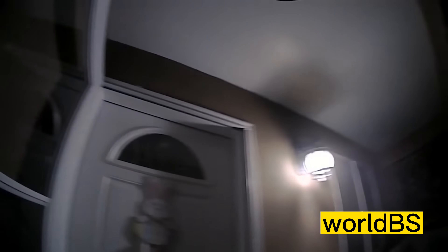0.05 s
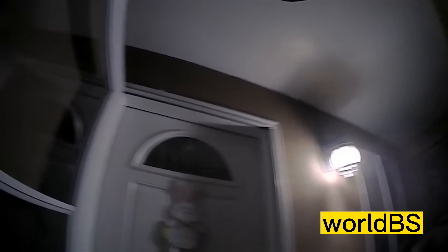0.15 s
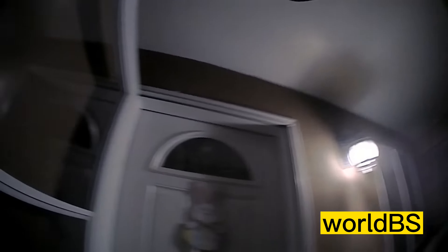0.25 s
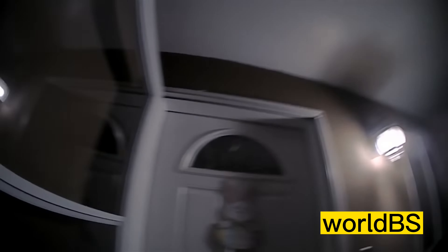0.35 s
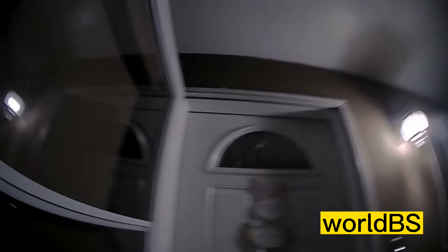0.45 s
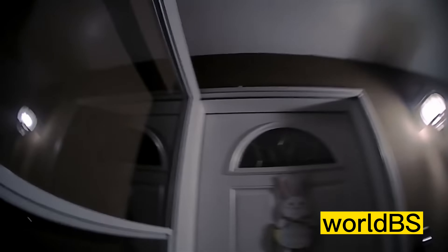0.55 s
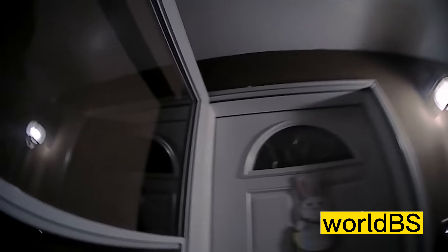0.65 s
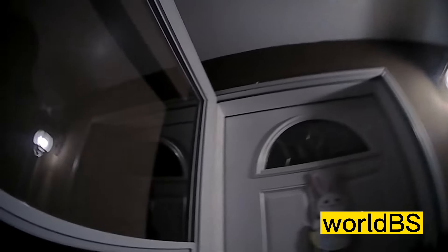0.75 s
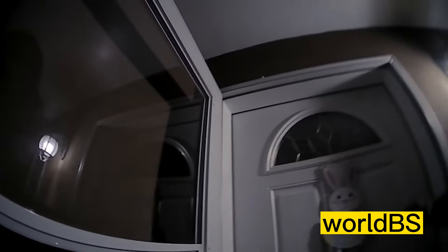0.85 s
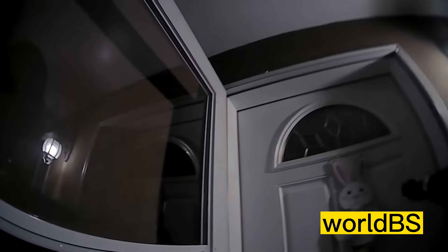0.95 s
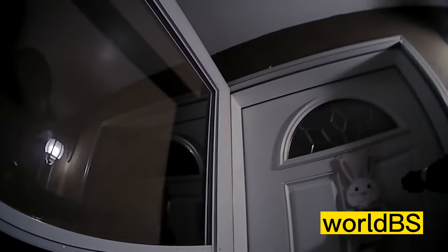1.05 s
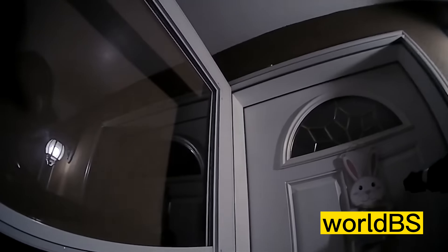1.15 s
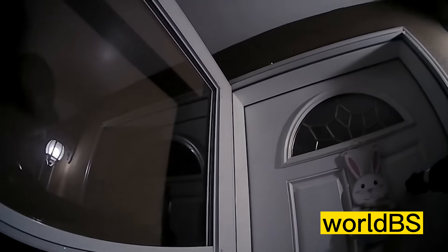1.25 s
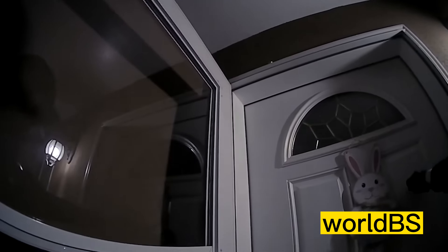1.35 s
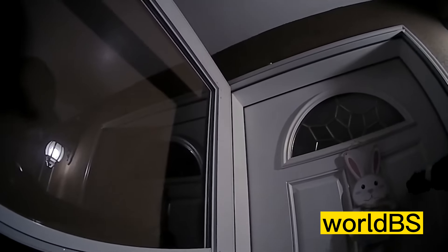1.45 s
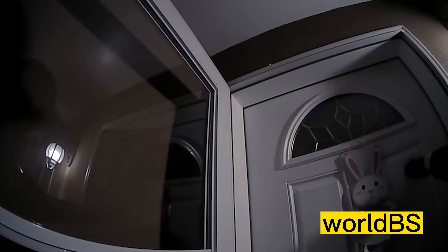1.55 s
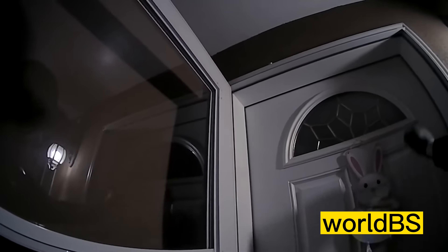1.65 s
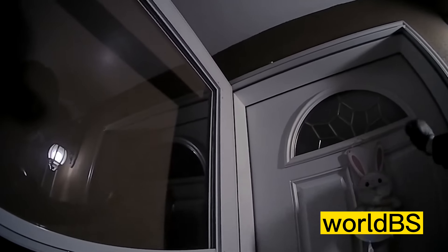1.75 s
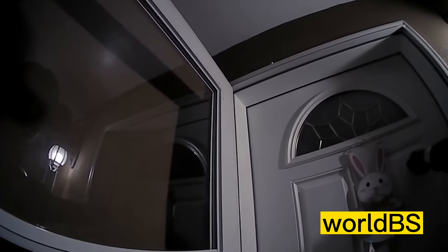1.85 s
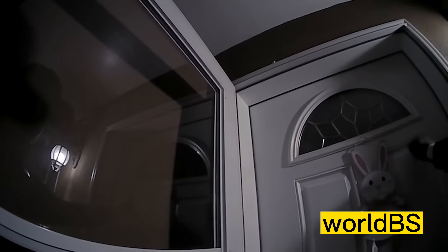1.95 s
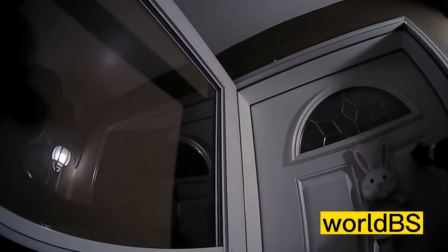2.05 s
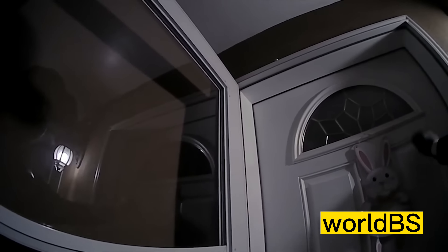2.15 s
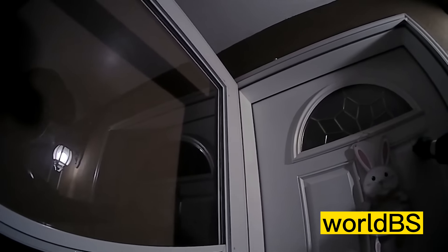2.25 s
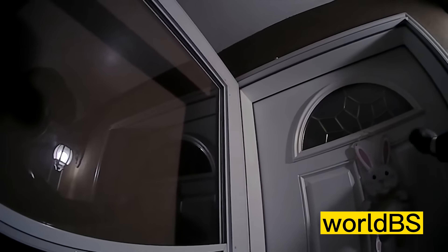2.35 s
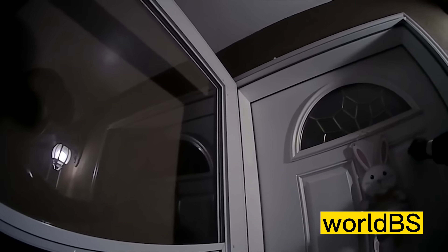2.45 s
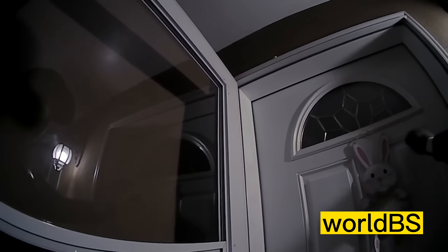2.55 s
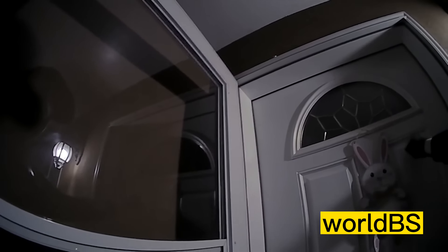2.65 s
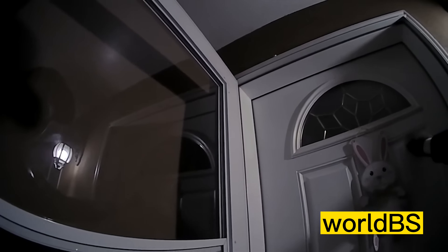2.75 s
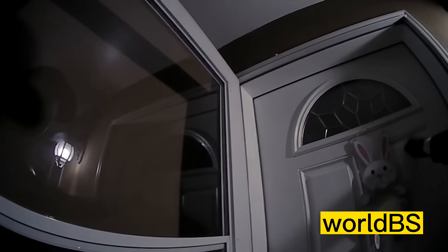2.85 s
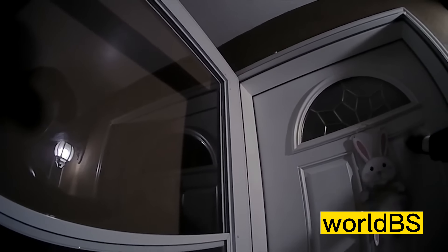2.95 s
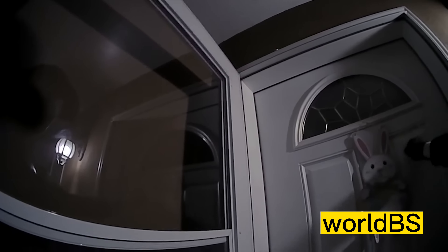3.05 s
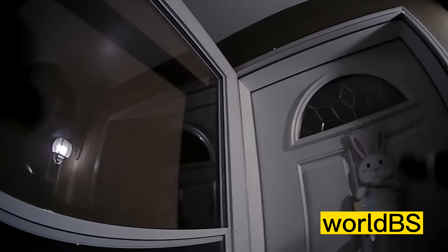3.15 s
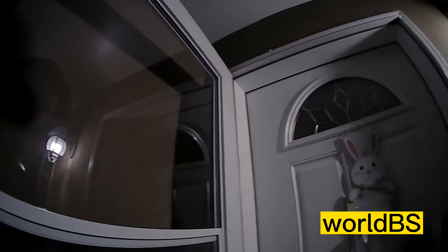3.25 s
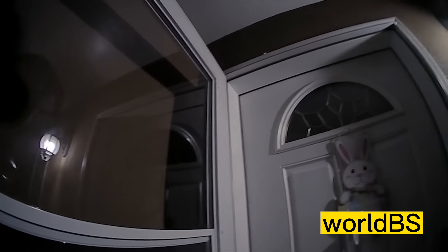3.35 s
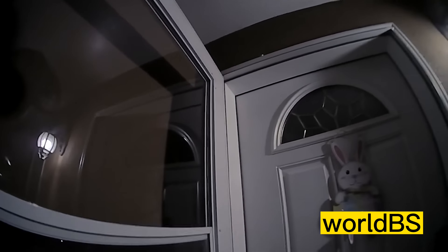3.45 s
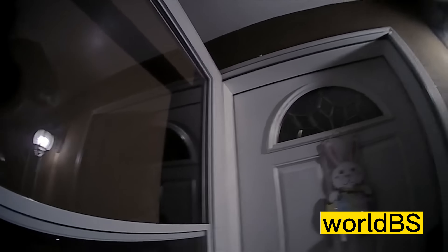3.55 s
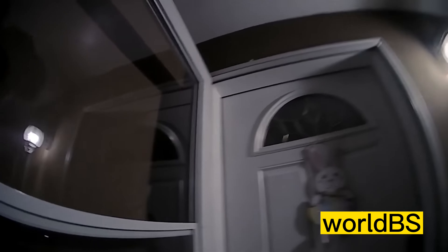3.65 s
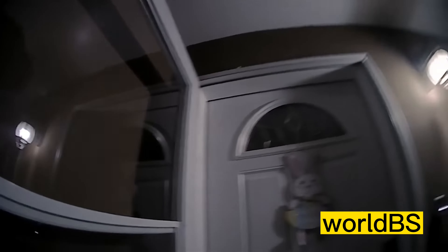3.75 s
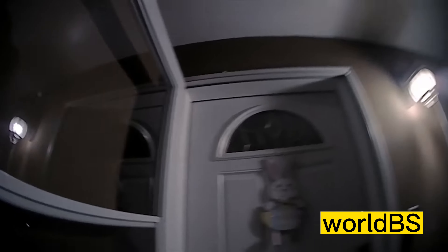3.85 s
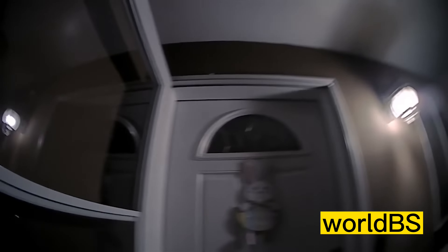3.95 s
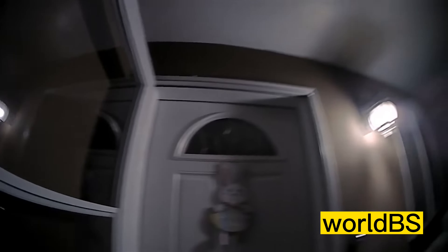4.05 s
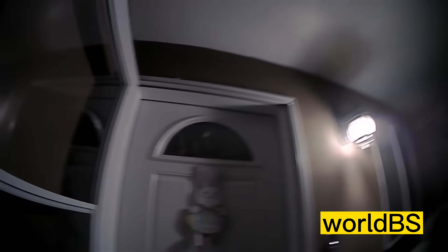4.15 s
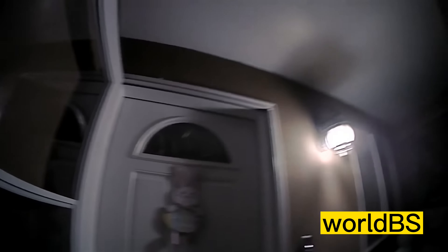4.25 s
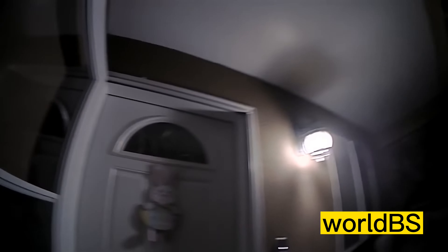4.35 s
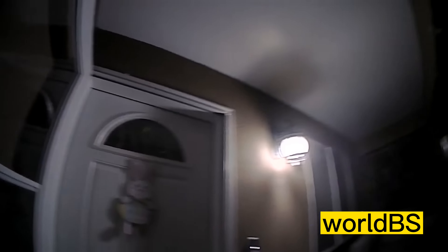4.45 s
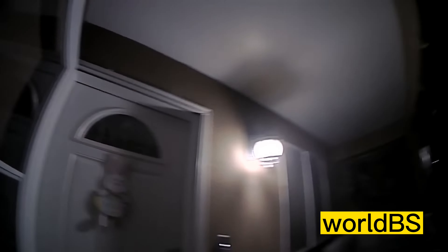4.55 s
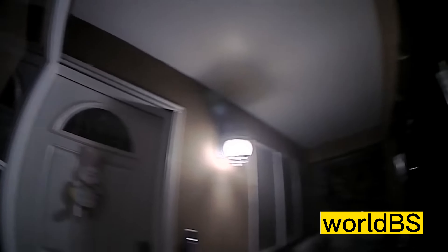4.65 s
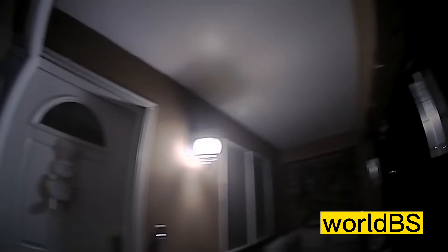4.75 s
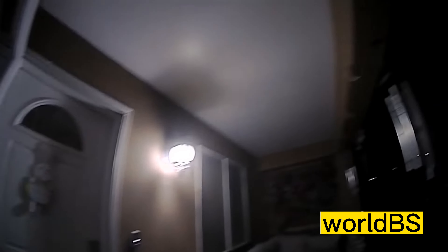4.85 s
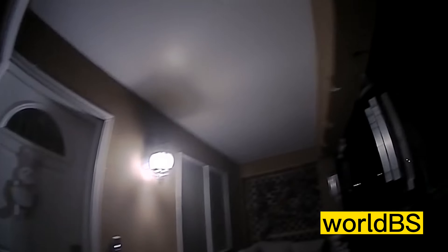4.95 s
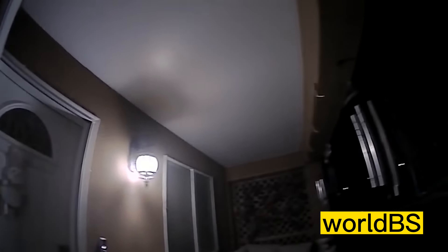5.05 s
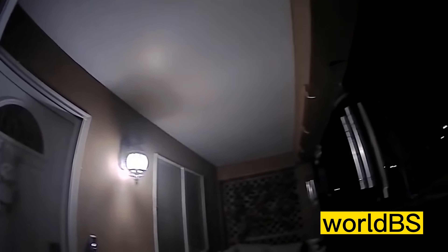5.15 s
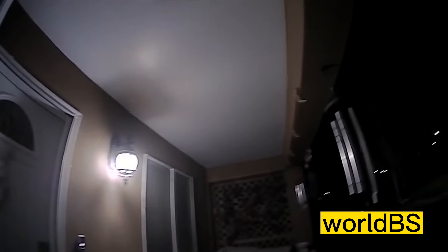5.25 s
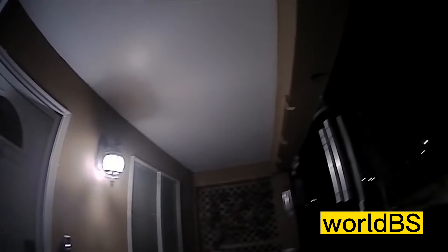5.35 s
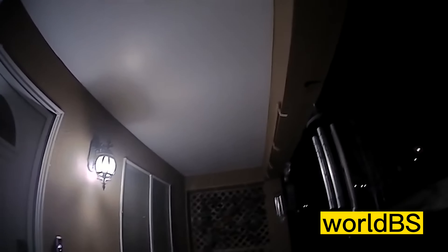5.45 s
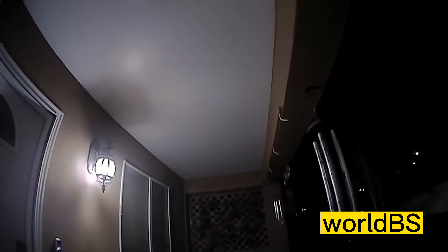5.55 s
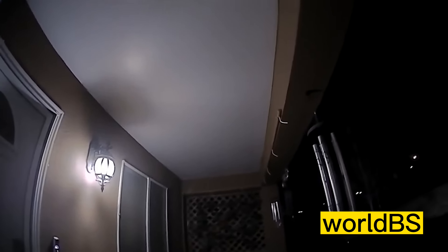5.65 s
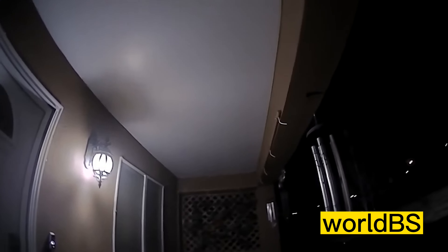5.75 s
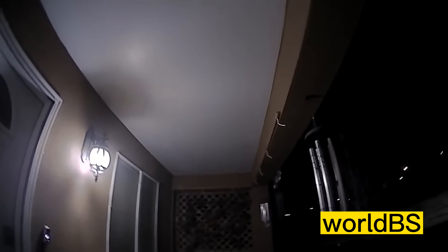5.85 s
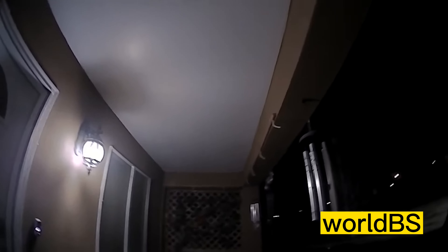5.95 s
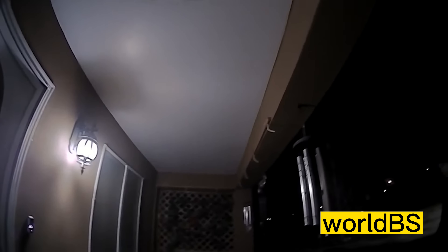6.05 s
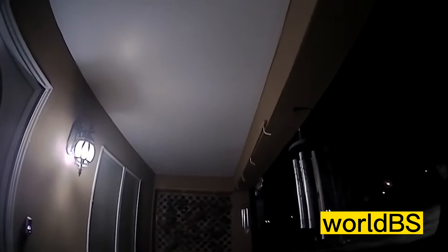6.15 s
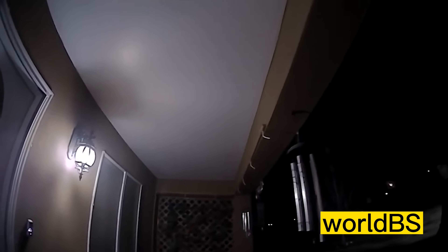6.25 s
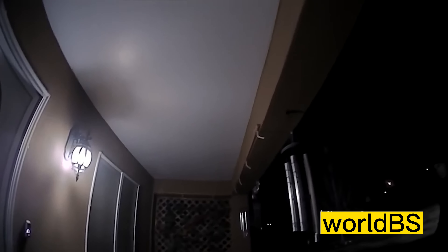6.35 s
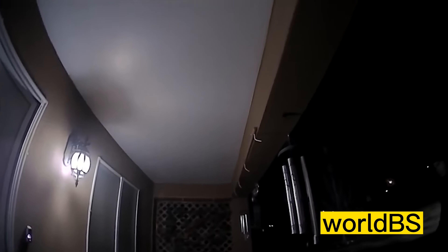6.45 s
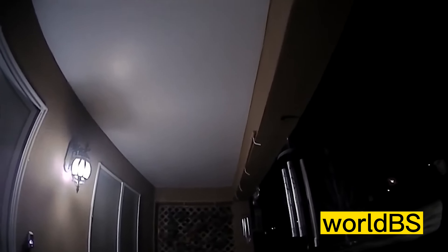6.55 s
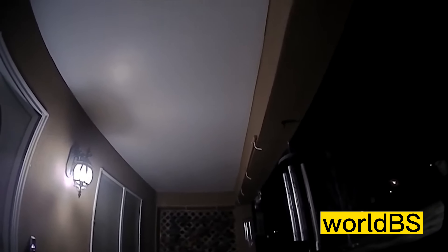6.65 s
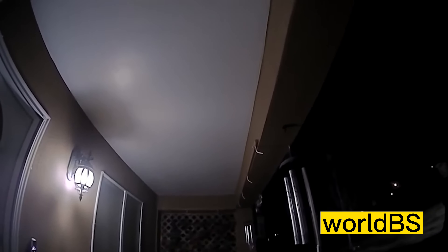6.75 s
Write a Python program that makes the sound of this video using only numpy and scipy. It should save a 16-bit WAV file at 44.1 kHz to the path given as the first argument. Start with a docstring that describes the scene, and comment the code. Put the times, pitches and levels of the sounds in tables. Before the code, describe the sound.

Close body-worn microphone under a porch roof, with low street hush throughout. Soft cloth movement and sharp metal clicks come first, with a distant car humming faintly. Seven hard padded knocks hit the house door in about a second, each with a deep thump, woody crack and short porch boom. Then handle and frame clatter, jacket swishes, a brief low shudder, and scattered light taps, scuffs and clicks as the person steps away.

```python
"""A gloved fist pounds seven times on a front door under a porch roof: struck modes, padded knocks, woody cracks.
A jacket rustles as shaped cloth noise; before and after the blows a storm door's handle snaps and rings.
Far off a car's rising sine drone fades out; later the storm door shudders, shoes tap and scuff the step,
and a few faint clicks are made the same way as the taps.
The hush of the street lies under it all, heard by one body-worn microphone; a limiter holds down the peaks."""
import sys
import numpy as np
from scipy import signal
from scipy.fft import rfft, irfft, next_fast_len
from scipy.io import wavfile
from scipy.ndimage import uniform_filter1d, minimum_filter1d, map_coordinates

SR = 44100
rng = np.random.default_rng(int(sys.argv[2]) if len(sys.argv) > 2 else 0)


def inscribe(sig):
    """Save sig as 16-bit PCM at rate SR to the path in sys.argv[1].

    A 1-D sig is mono; a 2-D sig holds one channel per row.
    Samples are clipped to [-1, 1] before scaling.
    """
    pcm = np.round(np.clip(np.atleast_2d(sig).T, -1, 1) * 32767)
    wavfile.write(sys.argv[1], SR, pcm.astype(np.int16))


N = 299034
TIME = np.arange(N) / SR  # seconds into the scene
AGE = TIME[:SR]  # seconds since a strike
SHARP_S = .0001  # rise time constant of a hard contact

# Levels in the tables are relative within their layer.
# hush of the street: (frequency [Hz], density [dB per Hz])
NIGHT_SPECTRUM = [(20, 17), (60, 6.5), (260, 5), (600, -5), (1200, -9.5), (1800, -7.5), (3000, -12.5),
                  (6000, -14), (10000, -24), (16000, -21)]

# jacket folds, a dull flap: (frequency [Hz], density [dB per Hz])
FOLD_SPECTRUM = [(70, -12), (150, 0), (400, -1), (620, 1.5), (1200, -5), (1800, -8.5), (2400, -6.5),
                 (3500, -15)]
# jacket weave, a bright hiss: (frequency [Hz], density [dB per Hz])
SWISH_SPECTRUM = [(1800, -42), (2700, -4), (3500, 2), (4600, -0.5), (6400, -2.5), (8500, -8), (11000, -9.5),
                  (14500, -6.5), (16000, -13)]
# movements of arm and body: (start [s], rise [s], hold [s], release [dB per s],
# swish level [dB], fold level [dB], swish pitch [Hz])
MOVES = [(0.206, 0.2, 0.049, 27, -53, -51.5, 6700), (0.989, 0.015, 0.29, 61, -51.5, -55, 4900),
         (3.372, 0.11, 0.58, 42, -66, -60, 4870), (3.88, 0.24, 0.064, 53.5, -44, -41, 5600),
         (4.884, 0.35, 0.057, 54, -47, -47.5, 5400), (5.268, 0.11, 0.17, 265, -51.5, -52, 3523),
         (5.543, 0.016, 0.32, 41, -66.5, -56, 3970), (6.484, 0.051, 0.024, 100, -66, -59, 2300)]
FOLD_LEAD_S = 0.0056  # the folds give before the weave starts to slide
SWISH_PEAK_DB, SWISH_WIDTH_OCT = 5, 0.52  # hump in the weave's hiss
FIDGET_SWISH_DB, FIDGET_FOLD_DB = -67.5, -62.5  # restless cloth between the larger movements
BRACED_S, SETTLE_S = (1.91, 3.68), 0.46  # fidgeting stops while the body is braced for the blows

# handle, fittings and small hard parts: (time [s], rattle level [dB], contact level [dB], frame level [dB],
# chatter t60 [s], tilt [dB per octave], ping pitch [Hz], ping level [dB])
CLICKS = [(.004, -43.5, 2, -7.5, 0.079, -1, 3580, -16), (0.711, -54, -19, -30, 0.074, 0.5, 3700, 5),
          (0.7316, -36, -7, -2.5, 0.1, 7, 6200, -3), (0.7546, -42.5, 6, -28, 0.036, 2, 5900, -2),
          (1.836, -51, 6, -15, 0.035, -4, 4915, 6), (3.7588, -31, 3.5, -19, 0.062, 0, 2150, -7),
          (3.7803, -38, -4, -1.5, 0.065, -3.5, 4980, 4), (3.8306, -35, -7, -1.5, 0.079, -1, 4240, 6.5),
          (3.8927, -41.5, -1, -4.5, 0.073, -3.5, 4150, 8), (3.96, -46, -5, -2.5, 0.04, -4, 3450, 7),
          (4.88, -55.5, -13, -1.5, 0.019, 8, 7070, 11.5), (5.751, -52.5, 5, -7, 0.14, -1.5, 3380, 3),
          (5.9637, -44.5, 4.5, -1, 0.07, -7, 1507, -1)]
# snap of the handle: (frequency [Hz], density [dB per Hz])
HANDLE_SPECTRUM = [(600, -16), (1450, -4), (1750, -4.5), (2150, -3.5), (2700, -6.5), (3200, 1.5), (4100, 1),
                   (6250, -1), (7300, -10.5), (10000, -20), (14000, -16), (16000, -28)]
# ring of the handle: (frequency [Hz], level [dB], t60 [s])
HANDLE_MODES = [(2150, 0, 0.23), (3280, -11, 0.079), (3480, -14, 0.11), (4190, 7, 0.068), (4600, -4, 0.15)]
# knock of the storm door's frame: (frequency [Hz], density [dB per Hz])
FRAME_SPECTRUM = [(100, -9), (220, -2.5), (310, 3.5), (420, 8.5), (560, 1.5), (800, -2), (1500, -9),
                  (3000, -10)]
# ring of the storm door's frame: (frequency [Hz], level [dB], t60 [s])
FRAME_MODES = [(391, -8, 0.07), (845, -20, 0.12), (1207, -9, 0.2)]
# jolts passed to the house door: (time [s], level [dB])
SHAKES = [(3.761, -17), (3.831, -17.5), (3.895, -18.5)]
CHATTER_DB = 2.5  # depth of the random flutter
CONTACT_T60_S, REBOUND_S = 0.005, .0032  # a hard part snaps, rebounds and snaps again
PING_T60_S = 0.031  # the struck part rings for a moment at its own pitch

# distant car
CAR_HZ, CLIMB_HZ_PER_S = 75.2, 12.2  # firing rate at time zero and its climb
CAR_DB, RECEDE_DB_PER_S = -58.5, 2  # base level and its loss as the car drives away
THROTTLE_S, THROTTLE_RAMP_S = (0.47, 3.8), 0.38  # throttle opens and closes; time it takes
PIPE_HZ, PIPE_WIDTH_HZ, PIPE_DB = 91.8, 1.3, 5.5  # exhaust resonance: centre, half width, boost

# fist blows: (time [s], strength [dB], hardness [dB], wood crack level [dB])
KNOCKS = [(2.0983, -1.5, 1.5, 0.5), (2.3041, -1, -0.5, -0.5), (2.4822, -2, 6.5, 3.5), (2.67, -2, 7.5, -1),
          (2.847, 0, 1, 0.5), (3.032, 0, -3, -2.5), (3.2313, 0, -1, -5.5)]
# house door in its frame: (frequency [Hz], level [dB], t60 [s])
DOOR_MODES = [(24.3, -28.5, 0.5), (22.27, -23.5, 0.36), (62.2, -28, 0.31), (51.8, -19.5, 0.11),
              (98.8, -45.5, 0.47), (134.4, -34.5, 0.15), (145.6, -31.5, 0.22), (167.6, -30, 0.19),
              (215, -9, 0.024), (209.9, -28.5, 0.26), (220.3, -31.5, 0.36), (266.9, -35.5, 0.34),
              (259.7, -33.5, 0.36), (305, -21, 0.093), (338, -37.5, 0.3), (359.2, -38.5, 0.24),
              (411.3, -29, 0.12), (465, -29.5, 0.11), (482, -41, 0.2), (520, -24, 0.045), (590, -31.5, 0.1),
              (606, -44, 0.19), (620, -36.5, 0.1), (666, -40, 0.18), (708, -43.5, 0.21), (773, -36, 0.078),
              (810, -51.5, 0.37), (902, -41, 0.11), (986, -55, 0.15), (1115, -43.5, 0.1)]
# woody crack of the panel: (frequency [Hz], density [dB per Hz])
CRACK_SPECTRUM = [(500, 11.5), (900, 1.5), (1150, -4.5), (2000, -2.5), (2500, -11), (3500, -50)]
# woody overtones under the knuckles: (frequency [Hz], level [dB], t60 [s])
WOOD_MODES = [(1544, -1, 0.039), (1890, -2.5, 0.066), (2030, -8, 0.11)]
# slap of the glove: (frequency [Hz], density [dB per Hz])
GLOVE_SPECTRUM = [(2300, 7), (3200, 9.5), (4000, 7.5), (5500, 11), (6700, 4.5), (9000, -21)]
MEAN_STOP_S, STOP_DB = .0095, -9  # the door is driven against its stop just after each blow
ECHO_S, ECHO_DB = 0.1, -36  # the blows come back from a house across the street

# reflections from porch walls and roof: (delay [s], level [dB])
WALLS = [(.0061, -23), (0.0113, -15.5)]

# small taps and scuffs, shoes on the step and a few faint clicks: (time [s], tap level [dB], scuff level [dB])
TAPS = [(4.028, -36, -42), (4.228, -46, -39.5), (4.53, -46.5, -62), (4.71, -62, -52.5), (4.979, -48.5, -45),
        (5.537, -43.5, -57), (5.585, -44.5, -76), (6.263, -51, -61), (6.38, -32, -41.5)]
# dull thud of a tap: (frequency [Hz], density [dB per Hz])
TAP_SPECTRUM = [(120, -4), (300, 2.5), (600, 6), (900, -1.5), (1500, 1.5), (1800, -11), (3000, -7),
                (6000, -19)]
# gritty scuff: (frequency [Hz], density [dB per Hz])
GRIT_SPECTRUM = [(700, -21), (1500, -8), (2080, -4.5), (2950, -6), (4000, -10.5), (6400, -12.5),
                 (10000, -27), (16000, -25)]
# ring of the porch step: (frequency [Hz], level [dB], t60 [s])
TREAD_MODES = [(576, -4, 0.13), (763.4, 2, 0.21), (1400, -7, 0.09)]
ROLL_S = .005  # between the two contacts of a tap; twice this to the scuff

TOP_HZ = 16000  # upper band limit of the recorder


def amp(db):
    """Decibels to gain."""
    return 10 ** (np.asarray(db) / 20)


def unit(x):
    """Scale to rms 1."""
    return x / np.sqrt(np.mean(x ** 2) + 1e-20)


def wobble(rate):
    """A smooth random curve, rate knots a second."""
    knots = rng.standard_normal(int(N * rate / SR) + 4)
    return map_coordinates(knots, [TIME * rate])


def noise(spectrum, size=SR, tilt_db=0):
    """Noise of rms 1 coloured by (Hz, dB) points, tilted by tilt_db an octave."""
    hz, db = np.transpose(spectrum)
    m = next_fast_len(size)
    f = np.fft.rfftfreq(m, 1 / SR)
    tilted_db = db + tilt_db * np.log2(hz)
    gain = amp(np.interp(np.log(f + 1), np.log(hz), tilted_db, left=-120, right=-120))
    return unit(irfft(rfft(rng.standard_normal(m)) * gain, m)[:size])


def fade(t60, attack=SHARP_S):
    """Envelope of a struck thing: quick rise, exponential decay."""
    decay = amp(-60 * AGE / t60)
    return decay * (1 - np.exp(-AGE / attack))


def mode(hz, t60):
    """One resonance, struck and dying away."""
    return fade(t60) * np.sin(2 * np.pi * hz * AGE)


def ringing(modes):
    """A set of (Hz, dB, t60 s) modes, each struck a little differently each time."""
    return sum(amp(db + 2 * rng.standard_normal()) * mode(hz, t60) for hz, db, t60 in modes)


def plateau(span, ramp):
    """Rises from 0 to 1 after the start of a span and falls back to 0 at its end."""
    return np.clip(np.minimum(TIME - span[0], span[1] - TIME) / ramp, 0, 1)


def stroke(start, rise, hold, release_db):
    """Envelope of one movement: it speeds up, holds, then dies away by release_db a second."""
    age = TIME - start
    return np.clip(age / rise, 0, 1) * amp(-release_db * np.maximum(age - rise - hold, 0))


def add(track, s, sound):
    """Mix a sound into a track at time s."""
    part = track[round(s * SR):][:len(sound)]
    part += sound[:len(part)]


def porch(x, standing_hz=221, standing_db=-54):
    """Near walls return early copies that comb the sound, and a standing wave hums under the roof."""
    hum = signal.fftconvolve(x, mode(standing_hz, t60=0.28))[:len(x)]
    out = x + amp(standing_db) * hum
    for delay, db in WALLS:
        add(out, delay, amp(db) * x)
    return out


def night():
    """The hush of the street: steady noise, strongest in the bass."""
    return amp(-61.0) * noise(NIGHT_SPECTRUM, size=N)


def sliding_weave(peak_hz):
    """The cloth's hiss with a hump at the pitch of one sliding movement."""
    hz, db = np.transpose(SWISH_SPECTRUM)
    grid = np.geomspace(hz[0], hz[-1], 60)
    base_db = np.interp(np.log(grid), np.log(hz), db)
    hump_db = SWISH_PEAK_DB * np.exp(-(np.log2(grid / peak_hz) / SWISH_WIDTH_OCT) ** 2)
    return noise(np.transpose([grid, base_db + hump_db]), size=N)


def jacket():
    """With each movement, folds of cloth flap dully while the weave swishes in tiny catches."""
    fidget = 1 - plateau(BRACED_S, SETTLE_S)
    fold_power = (amp(FIDGET_FOLD_DB) * fidget) ** 2
    swish = amp(FIDGET_SWISH_DB) * fidget * noise(SWISH_SPECTRUM, size=N)
    for s, rise, hold, release_db, swish_db, fold_db, swish_hz in MOVES:
        fold_power += (amp(fold_db) * stroke(s - FOLD_LEAD_S, rise, hold, release_db)) ** 2
        swish += amp(swish_db) * stroke(s, rise, hold, release_db) * sliding_weave(swish_hz)
    # slow catches move folds and weave together; the fine grain roughens only the weave
    catches = wobble(rate=60)
    grain = amp(1.8 * wobble(rate=1200))
    folds = np.sqrt(fold_power) * amp(1.07 * catches - 1.74) * noise(FOLD_SPECTRUM, size=N)
    return folds + amp(1.46 * catches + 0.63 * wobble(rate=27)) * grain * swish


def handle():
    """Metal parts snap twice, then chatter and ring briefly; the storm door's frame knocks along."""
    out = np.zeros(N)
    for s, db, contact_db, frame_db, t60, tilt_db, ping_hz, ping_db in CLICKS:
        chatter = amp(CHATTER_DB * wobble(rate=900)[:SR])
        strike = fade(t60, attack=0.0011) * chatter + amp(-11.0) * fade(0.29, attack=CONTACT_T60_S)
        for delay in (0, REBOUND_S):
            add(strike, delay, amp(contact_db) * fade(CONTACT_T60_S))
        snap = noise(HANDLE_SPECTRUM, tilt_db=tilt_db) * strike
        ring = ringing(HANDLE_MODES)
        ping = amp(ping_db) * mode(ping_hz, PING_T60_S) * chatter
        frame = noise(FRAME_SPECTRUM) * fade(0.26, attack=0.0019) + ringing(FRAME_MODES)
        rattle = amp(4.0) * snap + amp(-16.5) * ring + ping + amp(frame_db) * frame
        add(out, s, amp(db) * rattle)
    # some rattles shake the house door through the shared frame
    for s, db in SHAKES:
        add(out, s, amp(db) * door(hardness_db=-36))
    return out


def car():
    """A far exhaust: a sine at the firing rate climbs, booms at the pipe resonance and fades out."""
    hz = CAR_HZ + CLIMB_HZ_PER_S * TIME
    boom_db = PIPE_DB / (1 + ((hz - PIPE_HZ) / PIPE_WIDTH_HZ) ** 2)
    level_db = CAR_DB - RECEDE_DB_PER_S * TIME + boom_db + 1.75 * wobble(rate=8.4)
    level = plateau(THROTTLE_S, THROTTLE_RAMP_S) * amp(level_db)
    return level * np.sqrt(2) * np.sin(2 * np.pi * np.cumsum(hz) / SR)


def door(hardness_db, scatter_db=1.26, corner_hz=700):
    """The door's modes, alternating in sign; a harder blow feeds the high ones more."""
    ring = np.zeros(SR)
    for k, (hz, db, t60) in enumerate(DOOR_MODES):
        height = min(hz / corner_hz, 1) ** 2
        # the fist never lands on quite the same spot, which matters most to the high modes
        scatter = scatter_db * (1 + 2 * height) * rng.standard_normal()
        level_db = db + hardness_db * height + scatter
        ring += (-1) ** k * amp(level_db) * mode(hz, t60)
    return ring


def nudge():
    """A soft touch of the hand stirs mainly the door's low modes."""
    out = np.zeros(N)
    add(out, 1.5035, amp(-15.0) * door(hardness_db=-58))
    return out


def knocks():
    """Padded knuckles shove the panel, ring the door and crack; the porch booms and the street echoes."""
    out = np.zeros(N)
    u = AGE / 0.0007  # the shove peaks 0.7 ms after contact
    shove = amp(-1.5) * u * np.exp(-u)
    padding = signal.butter(6, 2350, fs=SR, output="sos")  # the glove dulls the knuckles
    knuckle = amp(-15) * signal.sosfilt(padding, mode(hz=1500, t60=.0022))
    for s, db, hardness_db, crack_db in KNOCKS:
        splinter = amp(-41.5) * noise(CRACK_SPECTRUM) * fade(0.17, attack=0.00052)
        crack = knuckle + splinter + amp(-45.5) * ringing(WOOD_MODES)
        add(crack, MEAN_STOP_S * rng.uniform(.85, 1.15), amp(STOP_DB) * knuckle)
        glove = amp(-48.0) * noise(GLOVE_SPECTRUM) * fade(0.14, attack=0.0023)
        tick = amp(-43.0) * rng.standard_normal(SR) * fade(0.02)
        boom_noise = noise([(120, 18.5), (300, 12.5), (700, 6.5), (1200, -24)])
        boom = amp(-33.0) * boom_noise * fade(0.31, attack=0.012)
        body = amp(db) * (door(hardness_db) + shove + boom)
        surface = porch(amp(crack_db) * crack + glove + tick)
        add(out, s, body + surface)
    echo_band = signal.butter(2, [550, 2000], "bandpass", fs=SR, output="sos")
    echo = signal.sosfilt(echo_band, out)
    add(out, ECHO_S, amp(ECHO_DB) * echo)
    return out


def swing():
    """The swinging storm door and the porch air hum: low noise with humps near 145 and 219 Hz."""
    shudder = noise([(110, -30), (145, -7), (180, -15), (219, 3), (260, -25)], size=N)
    return amp(-47.5) * stroke(start=3.94, rise=0.063, hold=0.11, release_db=72) * shudder


def taps_and_scuffs():
    """Shoes on the step and a few faint clicks: a double contact with a short ring, then a gritty scuff."""
    out = np.zeros(N)
    for s, tap_db, scuff_db in TAPS:
        contact = amp(-1.5) * fade(CONTACT_T60_S * 2)
        add(contact, ROLL_S, fade(0.085, attack=SHARP_S))
        tap = amp(tap_db) * (noise(TAP_SPECTRUM) * contact + amp(-7.0) * ringing(TREAD_MODES))
        scuff = amp(scuff_db) * noise(GRIT_SPECTRUM) * fade(0.24, attack=0.00088)
        add(out, s, tap)
        add(out, s + 2 * ROLL_S, scuff)
    return out


def scene():
    """Everything reaches one microphone, over the hush of the street."""
    near = porch(jacket() + amp(-1.0) * (handle() + taps_and_scuffs()))
    mono = night() + near + car() + nudge() + knocks() + swing()
    return np.array([mono, mono])


def record(dry):
    """A fast limiter holds the peaks down, and nothing passes above the band limit."""
    needed = np.minimum(1, amp(-16.2) / (np.abs(dry) + 1e-9))
    gain = uniform_filter1d(minimum_filter1d(needed, size=65), size=65)  # dips begin just before a peak
    m = next_fast_len(N + SR // 2)
    passband = np.fft.rfftfreq(m, 1 / SR) < TOP_HZ
    return irfft(rfft(dry * gain, m) * passband, m)[:, :N]


dry = scene()
out = record(dry)
inscribe(out)
```